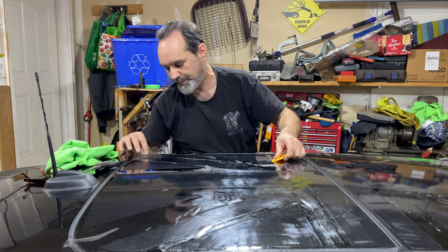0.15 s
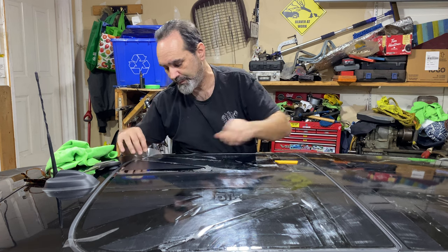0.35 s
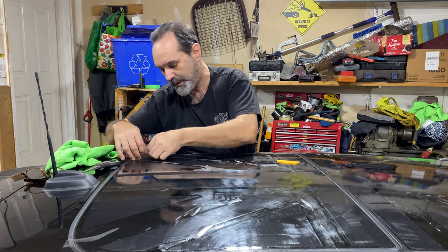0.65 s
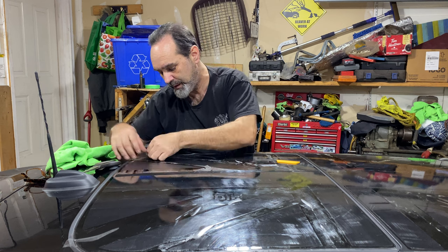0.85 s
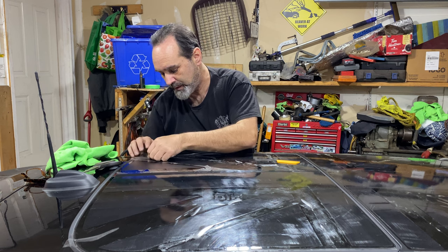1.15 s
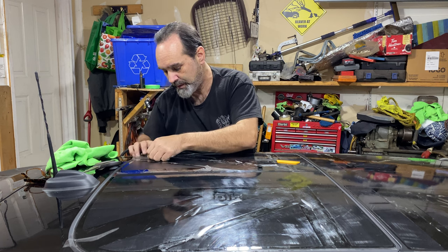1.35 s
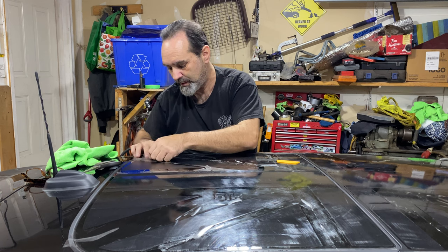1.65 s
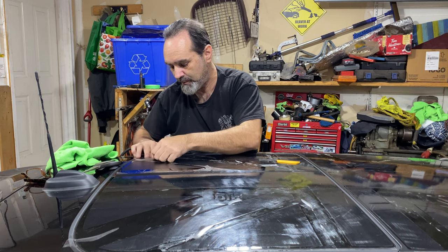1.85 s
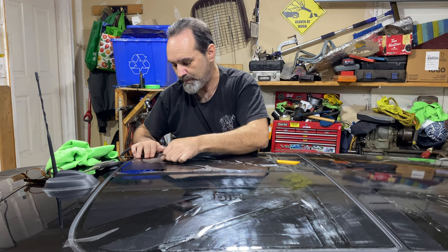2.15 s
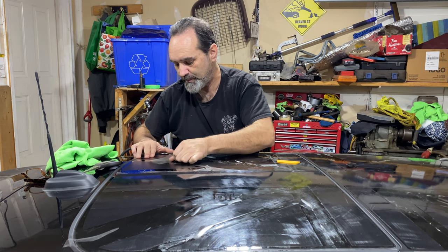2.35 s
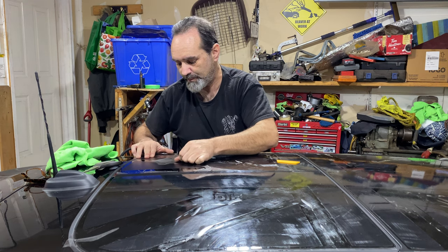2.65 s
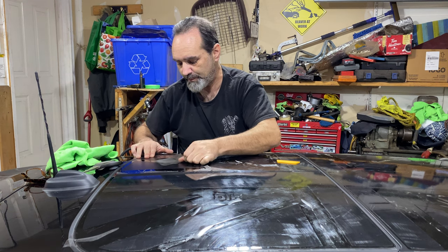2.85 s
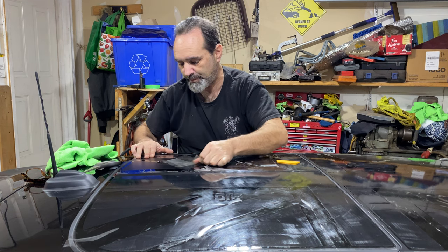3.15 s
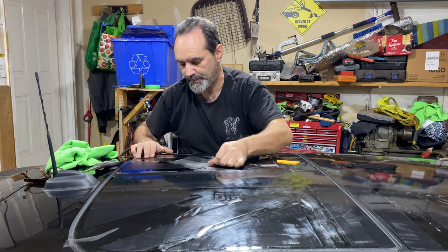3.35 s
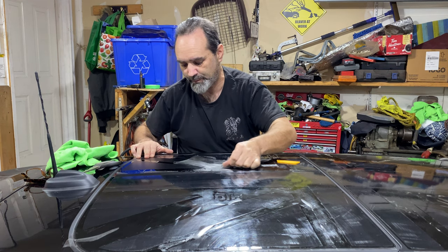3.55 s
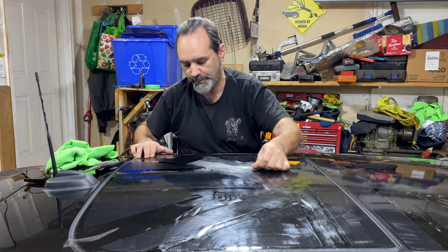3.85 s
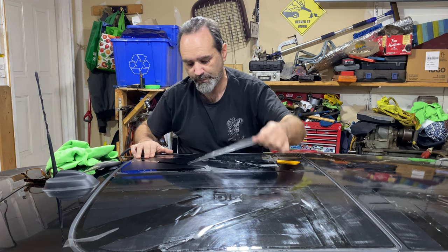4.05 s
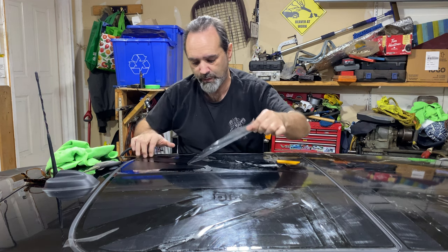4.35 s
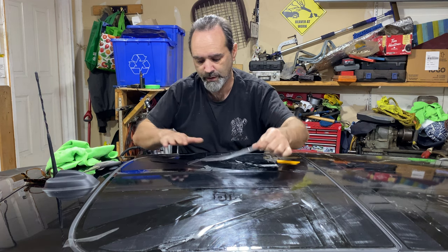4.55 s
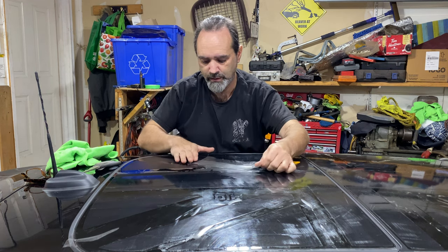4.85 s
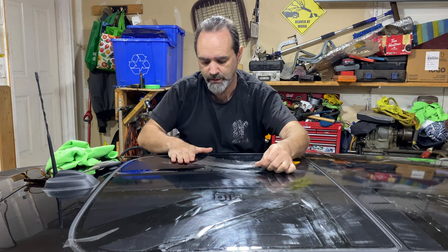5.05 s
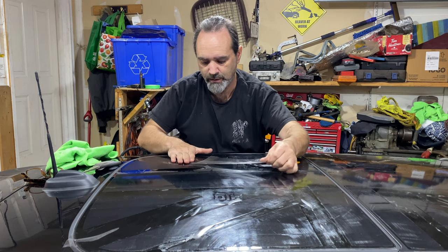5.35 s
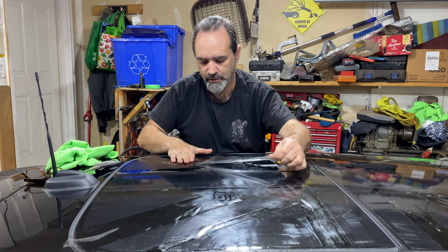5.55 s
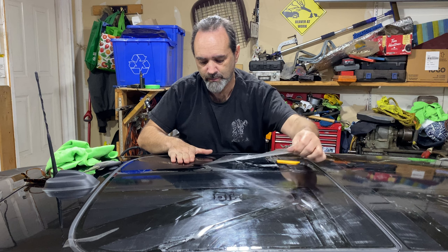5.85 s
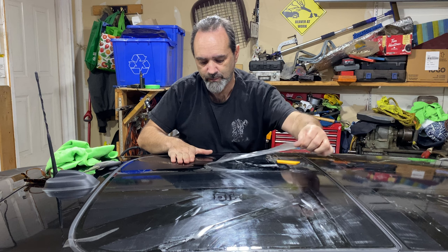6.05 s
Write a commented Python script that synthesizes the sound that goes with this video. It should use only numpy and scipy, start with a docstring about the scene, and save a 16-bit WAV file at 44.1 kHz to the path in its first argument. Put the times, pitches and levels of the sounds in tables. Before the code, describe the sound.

Tape is peeled off a car roof in two long hissing pulls, among light plastic clicks and soft thumps on sheet metal.

```python
"""A garage, two closely spaced microphones by a car roof. A plastic spreader is put down; fingers
pick at application tape and peel it off the vinyl in two long pulls. Countless snapping threads of
glue hiss, shake the lifted strip and drum on the roof panel, all following the speed of the pull.
Plastic clicks, the loose strip crinkles, hands bump the sheet metal. Behind the handwork are a short
room echo, a low rumble and a faint whistle."""
import sys
import numpy as np
from scipy import signal
from scipy.fft import rfft, irfft
from scipy.io import wavfile

SR = 44100
rng = np.random.default_rng(int(sys.argv[2]) if len(sys.argv) > 2 else 0)


def inscribe(sig):
    """Save sig as 16-bit PCM at rate SR to the path in sys.argv[1].

    A 1-D sig is mono; a 2-D sig holds one channel per row.
    Samples are clipped to [-1, 1] before scaling.
    """
    pcm = np.round(np.clip(np.atleast_2d(sig).T, -1, 1) * 32767)
    wavfile.write(sys.argv[1], SR, pcm.astype(np.int16))


N = 272744
TIME, FREQ = np.arange(N) / SR, np.arange(N // 2 + 1) * SR / N
HISS_BAND_HZ, FIZZ_BAND_HZ = (3000, 8000), (9500, 15500)
# The tape gives way and runs faster: start_s, length_s, speed_gain_db, ring_db (re the hiss)
SURGES = [(2.87, 0.12, 1, -7), (3.014, 0.11, 3, -8.5), (3.291, 0.13, 5, -16.5), (3.578, 0.064, 2.5, -15),
          (3.731, 0.18, 4, -16)]


def peel(pull, spectrum, hiss_db, rasp_db, fizz_db, drum_db, shudder_db,
         drum_low_hz, hollow_s, rasp_fall_db_per_s, drum_fall_db_per_s):
    """Glue threads snap; the lifted strip rasps with them and each tugs at the roof, which shudders."""
    speed_db = pull_speed(pull)
    away_s = np.abs(TIME - hollow_s)  # at hollow_s the peel line crosses the panel's most yielding part
    threads = snaps(per_s=9000, spread_db=1.5)
    tearing = shape(threads, from_db(along(spectrum)))
    upper, top = above(3140), above(7540)
    hiss = unit(shape(tearing, upper - top * upper), HISS_BAND_HZ) * from_db(hiss_db + speed_db)
    # The other bands grow more slowly with speed than the hiss.
    fizz = unit(shape(tearing, top * upper), FIZZ_BAND_HZ) * from_db(fizz_db + 0.76 * speed_db)
    rasp = unit(shape(tearing, 1 - upper), band_hz=(800, 2400))
    rasp *= from_db(rasp_db + 0.81 * speed_db - rasp_fall_db_per_s * away_s)
    drum = unit(shape(panel(threads), above(drum_low_hz) * (1 - above(357))), band_hz=(130, 480))
    drum *= from_db(drum_db + 0.37 * speed_db - drum_fall_db_per_s * away_s)
    tugs = snaps(per_s=600, spread_db=1.5)
    shudder = unit(shape(panel(tugs), 1 - above(263)))
    shudder *= from_db(shudder_db + 0.41 * speed_db) * np.exp(-(away_s / 0.32) ** 2)
    # The taut strip rings during each surge.
    taut = sum(from_db(db) * stroke(s, length_s) for s, length_s, _, db in SURGES)
    ring = unit(resonate_twice(threads, hz=2530, width_hz=1360)) * taut * from_db(hiss_db + speed_db)
    return hiss + rasp + ring + fizz + drum + shudder


def pull_speed(pull, brisk_db=-45, fade_s=0.04):
    """Speed of a pull in dB re a brisk one, with its surges; it dies away at both ends."""
    times_s, levels_db = np.transpose(pull)
    outside_s = np.maximum(times_s[0] - TIME, 0) + np.maximum(TIME - times_s[-1], 0)
    speed = from_db(np.interp(TIME, times_s, levels_db)) * np.exp(-(outside_s / fade_s) ** 2)
    surge_db = sum(db * stroke(s, length_s) for s, length_s, db, _ in SURGES)
    return 20 * np.log10(speed + 1e-9) - brisk_db + surge_db


def clicks(chatter_s=0.0013, chatter_db=-5):
    """Each sharp contact chatters briefly, makes a pop and knocks on the surface beneath."""
    # Spreader, nails and tape: start_s, level_db, centre_hz, width_hz, knock_db (re the level)
    contacts = [(0.0939, -17, 5570, 11000, 3.5), (0.2886, -5, 4570, 8060, 6),
                (0.2962, 3.5, 3700, 4600, -19), (0.297, 2, 8550, 9050, -14),
                (0.3009, -10.5, 3000, 5000, 9.5), (0.6449, -20.5, 8800, 8000, -29),
                (0.718, -34, 2000, 3500, -6), (0.82, -31, 2000, 2970, 4), (0.87, 2, 8300, 8700, -12),
                (0.872, -0.5, 2380, 3560, -17), (0.8785, -16, 2000, 3000, 4), (1.567, -37, 2000, 3000, 8),
                (2.3189, -21.5, 2000, 3520, 6), (3.3098, -0.5, 7860, 9000, -21),
                (3.6102, 2.5, 5200, 13000, -7.5), (3.617, -9.5, 2200, 4000, 2), (3.767, 1, 5150, 9000, -23),
                (4.1337, -18.5, 1930, 1800, -18), (4.163, -25, 2000, 3000, 6.5),
                (4.1754, -20, 6640, 9800, -15), (4.35, -39.5, 2000, 3010, 17.5),
                (4.5464, -5, 2030, 2550, -5), (4.5472, -15, 6600, 3000, -22),
                (4.7382, -30, 3460, 9200, -10)]
    track = np.zeros(N)
    fading = np.exp(-3 * TIME[:256] / chatter_s)
    for s, db, hz, width_hz, knock_db in contacts:
        chatter = rng.standard_normal(len(fading)) * fading
        contact = from_db(chatter_db) * chatter / np.linalg.norm(chatter)
        contact[0] = 1  # the main hit
        add(track, s, from_db(db) * np.convolve(contact / np.linalg.norm(contact), pop(hz, width_hz)))
        add(track, s, from_db(db + knock_db) * pop(hz=1110, width_hz=1170))
    return track


def spreader():
    """The plastic blade rings briefly as it is put down."""
    # The edge touches down: start_s, level_db
    taps = [(0.0923, -16.5), (0.2866, -9.5), (0.2962, -6)]
    # Blade modes: pitch_hz, width_hz, gain_db
    modes = [(1610, 200, -4.5), (2350, 490, 1.5), (3470, 420, 4.5), (5050, 700, -7), (6800, 690, -1.5)]
    force = np.zeros(N)
    for s, db in taps:
        add(force, s, from_db([db]))
    return sum(from_db(db) * resonate(force, hz, width_hz) for hz, width_hz, db in modes)


def roof_bumps():
    """Pushes on the roof: the softer the contact, the longer it lasts and the deeper the thud."""
    # Blows on the sheet metal: start_s, push_db, contact_s
    blows = [(0.091, -2.5, 0.0024), (.101, 0.5, 0.0035), (0.289, 1.5, 0.0014), (.298, -5, 0.00094),
             (0.312, 3.5, 0.0023), (0.571, 4, 0.0056), (.590, -3, 0.0043), (0.872, -8.5, 0.00021),
             (0.88, -1, 0.0091), (1.152, -10, 0.0021), (1.204, 9.5, 0.015), (2.314, 8, 0.013),
             (2.596, 4, 0.011), (3.612, -3, 0.0007), (4.03, -4, 0.0043), (4.35, -14.5, 0.001),
             (4.369, 2.5, 0.0085), (4.546, -13, 0.00064), (4.794, 10.5, 0.011)]
    force = np.zeros(N)
    for s, db, contact_s in blows:
        push = np.hanning(int(contact_s * SR))
        add(force, s, from_db(db) * push / push.sum())
    return panel(force)


def panel(force):
    """The sheet-metal roof rings in its low modes, alternating in polarity."""
    # Roof modes: pitch_hz, width_hz, gain_db
    modes = [(60.7, 16.4, 4.5), (100, 18.6, 4), (127.2, 23, 2), (174, 18, 4.5), (218.6, 26, -0.5),
             (281, 18, 4.5), (375, 77, -1.5), (457, 40, 1.5), (567, 82, -4), (780, 62, -4.5)]
    return sum((-1) ** k * from_db(db) * resonate(force, hz, width_hz)
               for k, (hz, width_hz, db) in enumerate(modes))


def finger_rubs(rub_db, fizz_db):
    """Skin and nails catch and slip on the tape's grain."""
    # Slides over the tape: start_s, length_s, level_db, top_db (extra gain of the fizz)
    slides = [(0.17, 0.19, -63.5, -3), (0.506, 0.14, -73.5, 1), (0.747, 0.14, -71, -1),
              (0.96, 0.24, -69.5, 1), (1.236, 0.046, -60, -7.5), (1.393, 0.068, -58.5, -11),
              (1.537, 0.13, -64, 2), (1.695, 0.073, -81.5, 5), (4.086, 0.08, -68, -1),
              (4.165, 0.07, -65, 0), (4.78, 0.066, -61.5, -31), (4.933, 0.11, -74, 2.5)]
    # Spectrum of rubbing skin: frequency_hz, gain_db
    skin = [(200, -4.5), (600, -6.5), (1200, -6), (1900, -6.5), (3400, 4), (5000, 3.5), (7000, -4),
            (10500, -7.5), (15500, -20)]
    slips = shape(snaps(per_s=3500, spread_db=3.5), from_db(along(skin)))
    top = shape(slips, above(9700))
    rub = unit(slips - top, HISS_BAND_HZ) * from_db(rub_db)
    fizz = unit(top, FIZZ_BAND_HZ) * from_db(fizz_db)
    return sum(stroke(s, length_s) * from_db(db) * (rub + fizz * from_db(top_db))
               for s, length_s, db, top_db in slides)


def scuffs():
    """A fingertip lands and slides briefly: a swelling and fading swarm of tiny pops."""
    # Landings: start_s, level_db, centre_hz, width_hz, length_s
    landings = [(0.275, -16, 4500, 6000, 0.018), (0.557, -22, 700, 1200, 0.011),
                (0.835, -10, 960, 1410, 0.02), (0.848, -17, 4900, 10200, 0.016),
                (1.138, -29, 810, 1590, 0.047), (2.07, -11.5, 1800, 1200, 0.11),
                (2.271, -11, 1290, 2450, 0.17), (4.529, -21, 1390, 3020, .014),
                (4.722, -26, 2500, 6000, 0.049), (4.801, -24, 2780, 5000, 0.014)]
    track = np.zeros(N)
    for s, db, hz, width_hz, length_s in landings:
        grip = np.hanning(int(length_s * SR))
        slips = rng.standard_normal(len(grip)) * grip / np.linalg.norm(grip)
        add(track, s, from_db(db) * np.convolve(slips, pop(hz, width_hz)))
    return track


def crinkle(level_db, start_s=4.125, length_s=0.1, first_hz=2200, last_hz=850, count=22):
    """The freed strip buckles in small pops that sink in pitch as it goes slack."""
    track = np.zeros(N)
    for slack in np.linspace(0, 1, count):
        late, detune, size = rng.standard_normal(3)
        hz = (first_hz + (last_hz - first_hz) * slack) * np.exp(0.23 * detune)
        s = start_s + length_s * slack + 0.00204 * late
        add(track, s, from_db(level_db + 2.5 * slack + 1.3 * size) * pop(hz, width_hz=750))
    return track


def room(x, wet_db, dull_hz, places, treble_t60_s=0.29, bass_t60_s=0.49, bounce_s=0.004, bounce_db=-11):
    """Direct sound, one bounce off a near surface, and a short tail that differs from place to place."""
    # Where the hands work: time_s, left_microphone_lead_ms
    hands = [(.3, -.02), (.6, 0.1), (2.2, 0.15), (3.3, 0.079), (3.9, 0.14), (6.1, -0.034)]
    size, hop = SR // 3, N // places
    noise, age_s = shape(diffuse(), 1 - above(dull_hz)), TIME[:size]
    treble = shape(noise, above(620))
    bass = noise - treble
    build_up = 1 - np.exp(-age_s / 0.002)
    fast, slow = (build_up * from_db(-60 * age_s / t60) for t60 in (treble_t60_s, bass_t60_s))
    wet = np.zeros((2, N))
    for start in range(-hop, N, hop):
        near = np.arange(max(start, 0), min(start + 2 * hop, N))
        part = x[near] * np.sin(np.pi * (near - start) / (2 * hop))  # equal-power fade between places
        pick = rng.integers(N - size)
        tails = treble[:, pick:pick + size] * fast + bass[:, pick:pick + size] * slow
        for channel, tail in zip(wet, tails / np.linalg.norm(fast)):
            add(channel, near[0] / SR, signal.fftconvolve(part, tail))
    top = shape(x, above(5240))  # reaches both microphones together
    lead_s = np.interp(TIME, *np.transpose(hands)) / 1000
    direct = top + np.array([np.interp(TIME + side * lead_s / 2, TIME, x - top) for side in (1, -1)])
    bounce = from_db(bounce_db) * np.interp(TIME - bounce_s, TIME, x)
    return direct + bounce + from_db(wet_db) * wet


def rumble(level_db):
    """Room tone: a steady low rumble with a faint hiss on top."""
    # Spectrum of the garage: frequency_hz, gain_db
    spectrum = [(20, -33), (32, -18), (42, -9), (62, -0.5), (80, -5.5), (120, -9), (180, -16), (300, -21),
                (550, -25.5), (1100, -30.5), (1400, -32.5), (2000, -35), (6000, -39), (15500, -49)]
    return unit(shape(diffuse(), from_db(along(spectrum)))) * from_db(level_db)


def whistle():
    """A narrow, wavering line of noise from somewhere in the room."""
    # Rise and fall of the whistle: time_s, level_db
    levels = [(0.05, -83), (4.65, -87.5), (4.8, -77), (5.0, -81), (5.35, -77), (5.6, -86)]
    line = resonate_twice(diffuse(), hz=1358, width_hz=44)
    return unit(line) * from_db(np.interp(TIME, *np.transpose(levels)))


def diffuse():
    """Noise from all sides as two closely spaced microphones hear it."""
    # Likeness of left and right: frequency_hz, correlation (0-1)
    likeness = [(60, 0.9), (250, 0.67), (700, 0.07), (2300, 0.41), (4000, 0.22), (6000, 0), (7500, 0.99),
                (9000, 0.92)]
    alike = along(likeness)
    mid, side = (shape(rng.standard_normal(N), np.sqrt((1 + sign * alike) / 2)) for sign in (1, -1))
    return np.array([mid + side, mid - side])


def snaps(per_s, spread_db):
    """Tiny impulses at random moments, a few much larger than the rest."""
    impulses = (rng.random(N) < per_s / SR) * rng.standard_normal(N)
    return impulses * from_db(spread_db * np.minimum(rng.exponential(size=N), 5))


def stroke(start_s, length_s, attack_s=0.034, release_s=0.04):
    """One hand movement sets in, holds and lets go."""
    rise = np.clip((TIME - start_s) / attack_s + .5, 0, 1)
    return rise * np.clip((start_s + length_s - TIME) / release_s + .5, 0, 1)


def pop(hz, width_hz):
    """A heavily damped ring of plastic or film."""
    return resonate_twice(signal.unit_impulse(1024), hz, width_hz)


def resonate(x, hz, width_hz):
    """Two-pole resonance, gain 1 at its centre."""
    w = np.tan(np.pi * hz / SR)
    k = w * width_hz / hz
    return signal.lfilter([k, 0, -k], [1 + k + w * w, 2 * (w * w - 1), 1 - k + w * w], x)


def resonate_twice(x, hz, width_hz):
    """Two equal resonances in series, steep on both sides."""
    return resonate(resonate(x, hz, width_hz), hz, width_hz)


def from_db(db):
    """Decibels to gain."""
    return 10 ** (np.asarray(db) / 20)


def along(points):
    """A table over log frequency, read at every bin."""
    hz, value = np.transpose(points)
    return np.interp(np.log(np.maximum(FREQ, 1)), np.log(hz), value)


def above(hz):
    """Gain of a steep high-pass."""
    return FREQ ** 4 / (FREQ ** 4 + hz ** 4)


def shape(x, gain):
    """Filter by a gain for each bin."""
    return irfft(rfft(x) * gain, N)


def unit(x, band_hz=(0, SR)):
    """Scale to rms 1 within a band."""
    in_band = shape(x, (FREQ >= band_hz[0]) & (FREQ <= band_hz[1]))
    return x / np.sqrt(np.mean(in_band ** 2))


def add(track, start_s, sound):
    """Lay a sound into a track."""
    start = int(start_s * SR)
    track[start:start + len(sound)] += sound[:N - start]


def scene():
    """All the handwork sounds in the same garage, over its room tone."""
    # Speed of each pull, on the decibel scale of the glue's hiss: time_s, speed_db
    first_pull = [(1.8, -70), (1.92, -55.5), (2.26, -50.5), (2.74, -54.5), (3.11, -42), (3.23, -45),
                  (3.32, -43), (3.93, -41), (4.06, -69.5)]
    second_pull = [(5.08, -87), (5.132, -59.5), (5.216, -54.5), (5.432, -50.5), (5.674, -40.5), (5.91, -46),
                   (6.18, -48)]
    # Spectrum of the peeling: frequency_hz, first_pull_db, second_pull_db
    spectra = [(200, -15.5, -35), (545, -25, -9), (730, -10.5, -0.5), (1110, -9.5, 0), (1680, -5, -0.5),
               (2900, -1, 0.5), (3400, -1.5, -3.5), (4660, 3.5, -2), (6600, 3.5, -2), (8140, 1.5, -4),
               (9900, 2, -1), (16500, -5, -6.5)]
    hz, first_db, second_db = np.transpose(spectra)
    first = peel(first_pull, np.c_[hz, first_db],
                 hiss_db=-53, rasp_db=-56, fizz_db=-55, drum_db=-66, shudder_db=-59.5,
                 drum_low_hz=220, hollow_s=3.193, rasp_fall_db_per_s=8, drum_fall_db_per_s=6.5)
    second = peel(second_pull, np.c_[hz, second_db],
                  hiss_db=-52.5, rasp_db=-52.5, fizz_db=-50.5, drum_db=-60.5, shudder_db=-73.5,
                  drum_low_hz=400, hollow_s=6.17, rasp_fall_db_per_s=15, drum_fall_db_per_s=46)
    rubs = finger_rubs(rub_db=-9, fizz_db=-6.5)
    tape = room(first + second + rubs, wet_db=4.5, dull_hz=18160, places=140)
    handling = clicks() + spreader() + scuffs() + crinkle(level_db=-26.5)
    taps = room(handling, wet_db=-1, dull_hz=11400, places=12)
    roof = room(roof_bumps(), wet_db=-2, dull_hz=8040, places=6)
    return tape + taps + roof + rumble(level_db=-60) + whistle()


def record(dry):
    """The two microphones differ a little in colour and the left lags in the treble; the top is cut."""
    treble_lag_s, split_hz, top_hz = 2.38e-4, 7000, 15900
    # Balance of the pair: frequency_hz, left_over_right_db
    balance_db = along([(60, 1.1), (250, .8), (700, 2.5), (2200, -0.5),
                        (4600, 3.0), (6200, 0.0), (7500, 0.5), (9000, 0)])
    turns = treble_lag_s * np.minimum(split_hz - FREQ, 0)
    microphones = np.array([from_db(balance_db / 2) * np.exp(2j * np.pi * turns),
                            from_db(-balance_db / 2)])
    low_pass = signal.ellip(10, .1, 80, top_hz, fs=SR, output="sos")
    return signal.sosfilt(low_pass, shape(dry, microphones))


dry = scene()
out = record(dry)
inscribe(out)
```